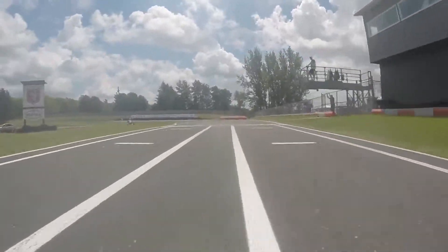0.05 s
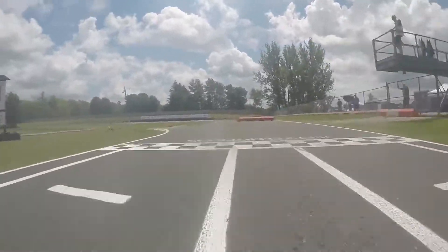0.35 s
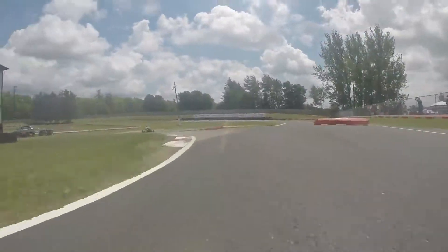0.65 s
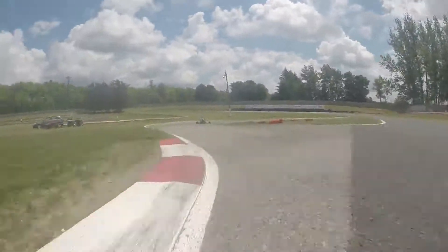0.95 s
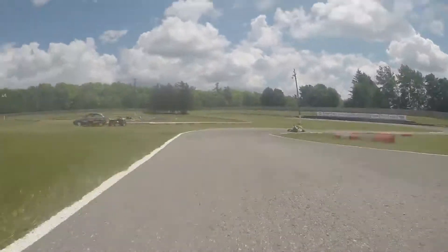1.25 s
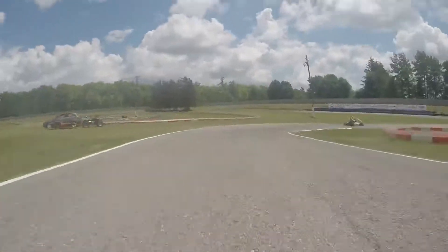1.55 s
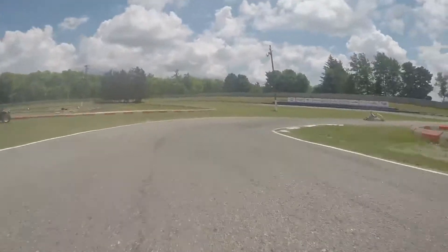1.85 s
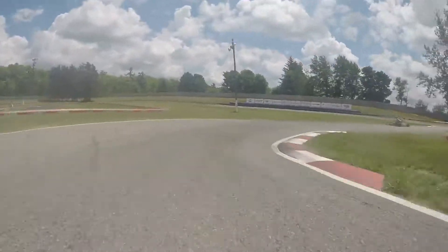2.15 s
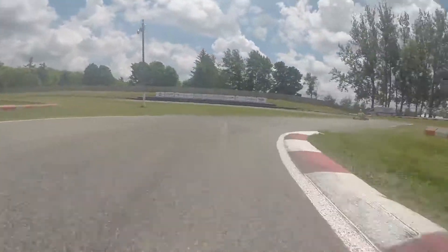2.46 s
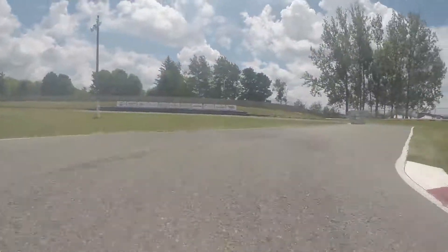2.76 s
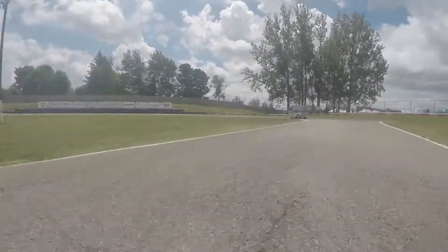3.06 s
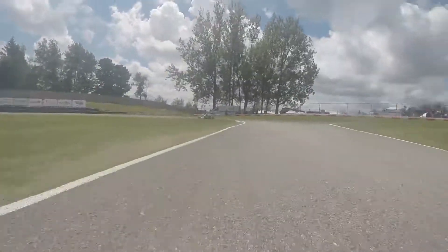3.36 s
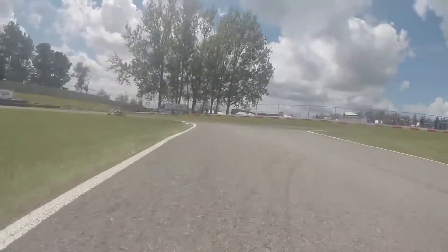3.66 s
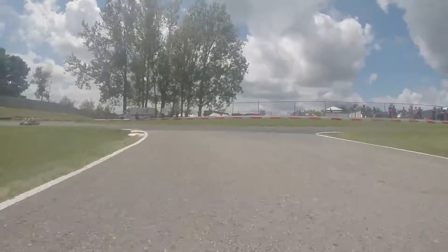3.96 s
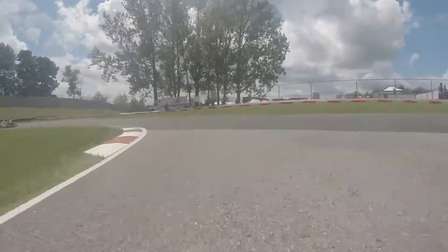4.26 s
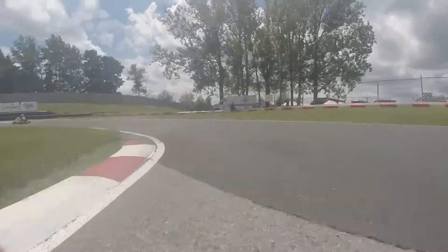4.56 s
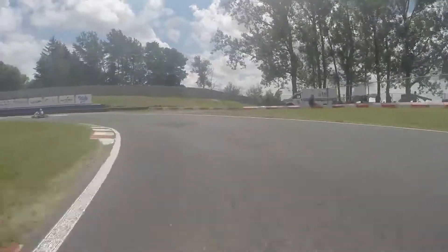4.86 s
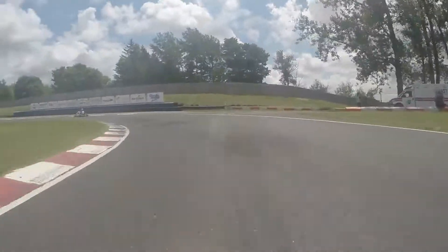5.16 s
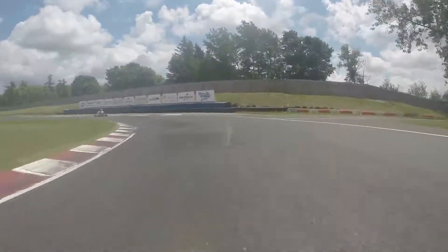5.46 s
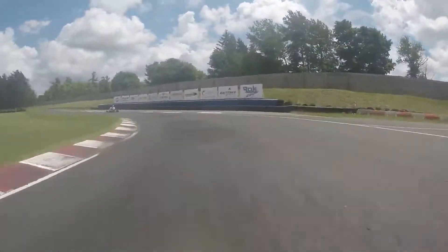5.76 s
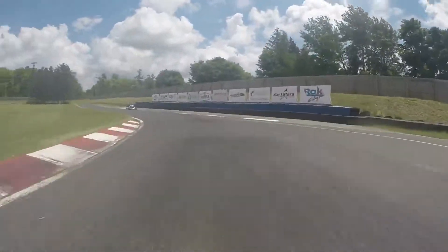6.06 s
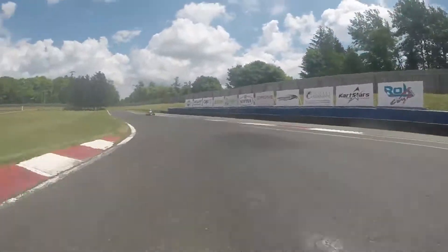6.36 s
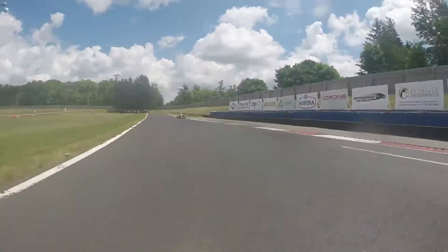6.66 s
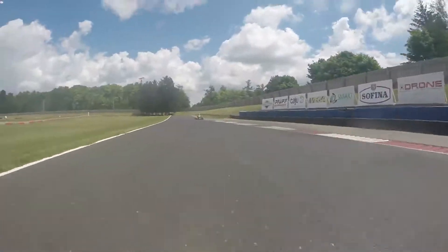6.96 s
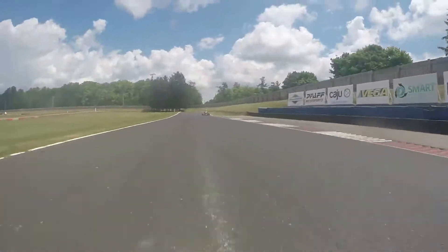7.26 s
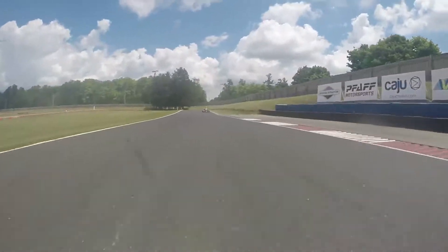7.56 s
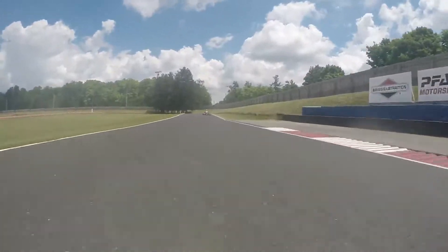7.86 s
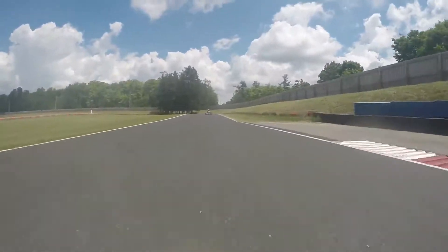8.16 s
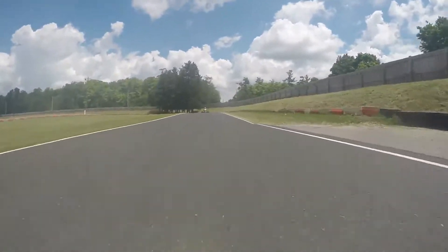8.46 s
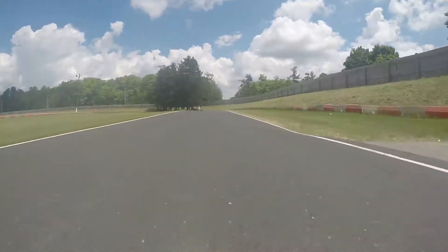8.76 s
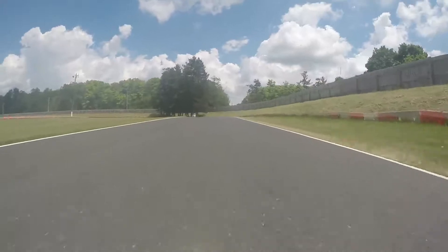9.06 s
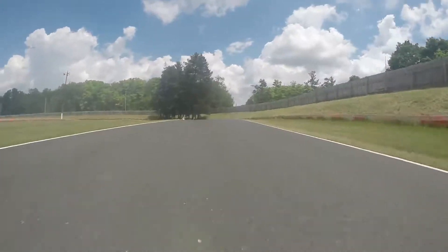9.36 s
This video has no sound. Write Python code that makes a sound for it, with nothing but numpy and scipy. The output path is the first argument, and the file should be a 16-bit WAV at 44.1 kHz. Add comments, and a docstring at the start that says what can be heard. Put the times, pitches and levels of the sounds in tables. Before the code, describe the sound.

A small single-cylinder kart engine throbs and hisses at speed, heard from on board on an outdoor track. It eases off for a corner, with sharp knocks, very short tyre skids and tiny clicks of flung stones. After running lower for a while, it climbs steadily in pitch, adding a hollow exhaust howl and the ticking of a loose part. Road drumming, panel rattle and low wind buffeting on the microphone continue throughout.

```python
"""On a kart track, riding a one-cylinder four-stroke kart as it slows for a corner and pulls away.
Each firing thumps the exhaust and lets out a puff of hiss. The turning engine shakes the frame;
when it works hard, the silencer howls and a loose part ticks louder. The road drums and rattles
the body panels, the tyres skid in short bursts and fling stone chips, bumps knock the frame
and wind buffets the microphone."""
import sys
import numpy as np
from scipy import signal
from scipy.fft import rfft, irfft, next_fast_len
from scipy.io import wavfile
from scipy.ndimage import uniform_filter1d, map_coordinates

SR = 44100
rng = np.random.default_rng(int(sys.argv[2]) if len(sys.argv) > 2 else 0)


def wrap_up_sound(samples):
    """Save the sound to the file named by the first command line argument, as 16-bit audio."""
    columns = np.atleast_2d(samples).T
    # keep every value between -1 and 1, then stretch to whole-number steps
    tamed = np.clip(columns, -1, 1)
    steps = np.round(tamed * 32767).astype(np.int16)
    wavfile.write(sys.argv[1], SR, steps)


N = 419391
TIME = np.arange(N) / SR

# notes the body panels ring at: (pitch [Hz], width [Hz], level [dB])
PANEL_NOTES = [(787, 11.4, 1), (1161, 230, 0), (1386, 132, 1), (1515, 74, -2), (1806, 44, -6.5),
               (2254, 310, -11)]
# notes of a clinking metal fitting: (pitch [Hz], width [Hz], level [dB])
FITTING_NOTES = [(1132, 102, 4.5), (1521, 42, 8.5)]
# tone of the road's drumming: (frequency [Hz], level [dB])
DRUM_TONE = [(50, -28.5), (110, -4.5), (150, 1.5), (195, 3), (250, 2), (310, 0), (380, -0.5), (420, -15),
             (470, -14.5), (540, -22), (700, -24.5), (1500, -60), (5000, -76)]


def amp(db):
    """Turn decibels into a number to multiply by."""
    return 10 ** (np.asarray(db) / 20)


def unit(x):
    """Scale a signal to an average strength (rms) of 1."""
    return x / np.sqrt(np.mean(x ** 2) + 1e-20)


def curve(points):
    """Join (time, value) points with straight lines."""
    return np.interp(TIME, *np.transpose(points))


def wobble(rate):
    """A smooth random curve through `rate` new values a second."""
    return map_coordinates(rng.standard_normal(int(N * rate / SR) + 4), [TIME * rate])


def white():
    """Fresh white noise."""
    return rng.standard_normal(N)


def colour(x, tone):
    """Give x the bass and treble of a tone table, at strength 1."""
    size = 2 * next_fast_len(N // 2 + 8192)
    hz, db = np.transpose(tone)
    log_gain = np.log(amp(np.interp(np.log(np.fft.rfftfreq(size, 1 / SR) + 1), np.log(hz), db)))
    # make the filter ring after each hit, never before it
    cepstrum = irfft(log_gain)[:size // 2]
    cepstrum[1:] *= 2
    return unit(irfft(rfft(x, size) * np.exp(rfft(cepstrum, size)))[:N])


def resonate(x, notes):
    """Let x ring an object's notes, at strength 1; narrow notes ring longer."""
    size = next_fast_len(N + 8192)
    f = np.fft.rfftfreq(size, 1 / SR)
    gain = sum((-1) ** k * amp(db) * hz * width / (hz * hz - f * f + 1j * f * width)
               for k, (hz, width, db) in enumerate(notes))
    return unit(irfft(rfft(x, size) * gain, size)[:N])


def fade(taps, life_s):
    """Give each tap a tail that dies away."""
    return signal.lfilter([1], [1, -np.exp(-1 / (life_s * SR))], taps)


def strokes(cycles, jitter_s, scatter_db):
    """One tap per cycle, a little uneven in time and size."""
    at = np.flatnonzero(np.diff(np.floor(cycles)) > 0)
    late, size = rng.standard_normal((len(at), 2)).T
    when = np.clip(at + late * jitter_s * SR, 0, N - 1).astype(int)
    return np.bincount(when, amp(scatter_db * size), N)


def once_a_cycle(cycles, lag, depth_db):
    """A volume curve that swells once in each cycle."""
    return unit(amp(depth_db * np.cos(np.pi * (cycles - lag)) ** 4))


def wind():
    """Gusts hit the microphone with a low, lumpy rumble."""
    # strength of the wind: (time [s], level [dB])
    gusts = [(0, -22.5), (1.2, -15), (1.75, -19), (2.2, -27), (2.9, -16), (3.7, -27.5), (4.35, -18.5),
             (5.6, -24), (6.6, -25.5), (9.5, -23.5)]
    # tone of the rumble: (frequency [Hz], level [dB])
    tone = [(10, -23.5), (22, -9.5), (35, 6.5), (50, 4), (70, -11), (120, -7), (400, -72)]
    return amp(curve(gusts) + 1.2 * wobble(5)) * colour(white(), tone)


def swish():
    """One soft, high swish near the start."""
    swell = np.exp(-((TIME - .37) / .14) ** 2)
    return amp(-40) * swell * colour(white(), [(1500, -30), (3000, 3), (3700, 4), (4800, -2), (8000, -42)])


def track():
    """Each stretch of track sets its own rattle, buzz and drumming, blending into the next."""
    # stretches of track: (start [s], panel rattle [dB], tray buzz [dB], drumming [dB])
    stretches = [(0, -35.5, -35, -20), (1.2, -34, -37.5, -18), (3.2, -35.5, -38, -18.5),
                 (4.45, -42.5, -49, -19.5), (5.3, -40.5, -52, -18.5), (6.12, -36, -35.5, -18),
                 (7.45, -39, -34.5, -20.5), (8.3, -36, -33, -18.5)]
    blend_s = .15
    starts, *levels = np.transpose(stretches)
    current = np.searchsorted(starts[1:], TIME)
    return [uniform_filter1d(db[current], int(blend_s * SR)) for db in levels]


def chips():
    """Flung stones hit the kart with tiny bright clicks; sand patters until it has slowed down."""
    # stone hits: (time [s], relative level [dB])
    stones = [(1.3724, -23.5), (1.6647, -25), (1.752, -23), (1.8983, -27), (2.047, -25), (2.624, -31)]
    # tone of the clicks: (frequency [Hz], level [dB])
    tone = [(1500, -25), (4000, 7.5), (7500, 6), (13500, -12), (15400, -20)]
    grains_per_s, sand_until_s = 30, 2.1
    hits, t = np.zeros(N + SR), np.arange(SR // 50) / SR
    for start, db in stones:
        click = rng.standard_normal(len(t)) * np.exp(-t / .0014)
        hits[round(start * SR):][:len(t)] += amp(db + 1) * click / np.abs(click).max()
    grains = (rng.random(N) < grains_per_s / SR) * rng.random(N) * (TIME < sand_until_s)
    clicks = hits[:N] + amp(-28.5) * white() * fade(grains, life_s=.0006)
    return clicks.std() * colour(clicks, tone)


def skids():
    """Tyres skip over the asphalt, shaking the kart and spraying grit."""
    # skids: (middle [s], level [dB], half length [s], grit compared with the level [dB])
    bursts = [(0.147, -29, 0.0094, -1), (0.953, -30, 0.01, -6.5), (1.315, -26.5, 0.029, -8),
              (1.588, -18, 0.0082, -9), (1.797, -23, 0.011, -5), (1.869, -26, 0.011, -23),
              (1.907, -24.5, 0.0055, -8.5), (1.989, -19, 0.012, -14.5), (2.129, -28.5, 0.018, -16),
              (2.52, -16, 0.016, -23), (3.31, -24.5, 0.0078, -16), (3.741, -25.5, 0.015, -14.5),
              (7.146, -26.5, 0.0084, -10), (7.174, -22.5, 0.0032, -1.5), (7.317, -31, 0.0035, -1),
              (7.331, -30.5, 0.0033, 0.5)]
    # tone of the grit: (frequency [Hz], level [dB])
    grit_tone = [(800, -12.5), (2400, 13.5), (3300, -2), (5500, 4), (7500, -4.5), (9000, -14), (12000, -34),
                 (15400, -39)]
    shake, grit = np.zeros(N), np.zeros(N)
    for middle, db, half_s, grit_db in bursts:
        swell = amp(db) / (1 + ((TIME - middle) / half_s) ** 4) ** .5
        shake += swell
        grit += swell * amp(grit_db)
    body = resonate(white(), PANEL_NOTES) + amp(2.5) * colour(white(), DRUM_TONE)
    body += amp(-7.5) * resonate(white(), FITTING_NOTES)
    spray = colour(white() * amp(3.3 * wobble(700)), grit_tone)
    return shake * body + grit * spray


def knocks():
    """Bumps knock the frame; each knock has its own loudness and brightness."""
    # blows: (time [s], level [dB], brightness [dB per octave])
    blows = [(1.366, -5, 5), (1.371, -5.5, 4), (1.711, -16, 6), (1.86, -7.5, 0), (1.956, -18, 2),
             (4.17, -11.5, -4), (4.231, -13, -4), (4.307, -6, -1), (4.398, -8, -2), (7.558, -17, 4),
             (8.523, -13, 4), (9.024, -7.5, 4)]
    # notes of the struck frame: (pitch [Hz], level [dB], time to fade by 60 dB [s])
    notes = [(510, -8.5, 0.015), (780, -6, 0.02), (960, 9, 0.0075), (1125, 1, 0.023), (1287, -5, 0.015),
             (1790, -7.5, 0.011), (2270, -1.5, 0.013)]
    out, t = np.zeros(N + SR), np.arange(SR // 8) / SR
    for start, db, brightness in blows:
        ring = np.zeros(len(t))
        for hz, note_db, fade_s in notes:
            struck_db = note_db + brightness * np.log2(hz / 1000) + rng.normal(0, 2.2)
            ring += amp(struck_db - 60 * t / fade_s) * np.sin(2 * np.pi * (hz * t + rng.random()))
        ring *= 1 - np.exp(-(t / .0005) ** 2)  # soften the very start
        thud = .65 * amp(-60 * t / .034) * np.sin(2 * np.pi * 290 * t)
        out[round(start * SR):][:len(t)] += amp(db) * (ring / np.abs(ring).max() + thud)
    return out[:N]


def rattle(cycles, rattle_db):
    """The panels rattle, harder when the road jolts them; the engine clinks a fitting on some turns."""
    jolts = (rng.random(N) < 60 / SR) * rng.random(N)
    clumps = 1 + 1.8 * np.tanh(2 * fade(jolts, life_s=.003))
    contacts = white() * (rng.random(N) < 2500 / SR)
    clinks = strokes(2 * cycles, jitter_s=.003, scatter_db=2) * (rng.random(N) < .3)
    sound = resonate(contacts * clumps, PANEL_NOTES) + .6 * resonate(clinks, FITTING_NOTES)
    return amp(rattle_db + wobble(15)) * sound


def strain(rate, throttle):
    """How hard the engine works, 0 to 1: it takes both speed and an open throttle."""
    full_rate_hz, shut_db, db_per_hz = 40.9, -28.5, 4.5
    return amp(shut_db * (1 - throttle) - db_per_hz * np.maximum(full_rate_hz - rate, 0))


def loose_parts(cycles, effort, buzz_db):
    """The engine's shaking buzzes the floor tray and taps a loose part, louder under strain."""
    # spells of harder ticking: (start [s], length [s])
    spells = [(8.345, 0.093), (8.464, 0.19), (8.882, 0.072), (9.024, .1), (9.157, .26)]
    # notes of the loose part: (pitch [Hz], width [Hz], level [dB])
    part_notes = [(1444, 29, 5.5), (2230, 130, 3), (2410, 190, 0), (3880, 79, -17.5)]
    # notes of the floor tray: (pitch [Hz], width [Hz], level [dB])
    tray_notes = [(444, 75, -2), (737, 133, -1.5), (827, 67, 2.5)]
    rest_db, strain_db, spell_boost_db = -51, -37, 6.5
    in_spell = sum((TIME > start) & (TIME < start + length) for start, length in spells)
    tick_gain = amp(rest_db) + effort * amp(strain_db + spell_boost_db * in_spell)
    force = amp(2.5 * np.tanh(1.5 * wobble(25)))
    force *= np.where(rng.random(N) < .55, 1, .25)  # some turns barely tap
    taps = strokes(2 * cycles + .3, jitter_s=.0008, scatter_db=1.8) * force
    # each tap bounces for a moment and jars the panels too
    bounces = unit(fade(taps, life_s=.0039))
    ticks = .85 * resonate(taps, part_notes) + .6 * resonate(white() * bounces, PANEL_NOTES)
    buzz = resonate(white() * (1 + 1.15 * bounces), tray_notes)
    return tick_gain * ticks + amp(buzz_db) * buzz


def howl(cycles, effort):
    """Under strain, rough firings make the silencer howl."""
    # notes of the silencer: (pitch [Hz], width [Hz], level [dB])
    notes = [(169, 37, -3.5), (391, 36, 4.5)]
    firings = strokes(cycles + .33, jitter_s=.0003, scatter_db=2)
    return amp(-29) * effort * resonate(firings, notes)


def fizz(rush, throttle):
    """Opening the throttle brightens the top of the hiss."""
    from_hz, shut_db, open_db = 9000, -4.5, 2
    top = signal.sosfiltfilt(signal.butter(3, from_hz, "high", fs=SR, output="sos"), rush)
    return rush + (amp(shut_db * (1 - throttle) + open_db * throttle) - 1) * top


def hiss(cycles, throttle):
    """Gas puffs out once a cycle, more sharply on open throttle, and the engine's metal rings."""
    # loudness of the hiss: (time [s], relative level [dB])
    levels = [(0, -44.5), (1.3, -46), (2.2, -51), (3.0, -48.5), (4.2, -47.5), (6.7, -45.5), (7.9, -49.5),
              (8.5, -47.5), (9.5, -49)]
    # tone of the rushing gas: (frequency [Hz], level [dB])
    tone = [(400, -24), (900, 6.5), (1500, 8), (1950, 6.5), (2350, 13.5), (3100, 0), (4200, 1.5),
            (5000, -2.5), (7200, -4), (8300, -9), (10200, -11), (11500, -18), (13500, -20.5), (15400, -40)]
    # notes of the engine's metal: (pitch [Hz], width [Hz], level [dB])
    metal_notes = [(3850, 67, -1), (4340, 64, 6), (5110, 69, 4), (5900, 60, 3.5), (6800, 115, 0.5),
                   (7300, 150, 0)]
    puffs = once_a_cycle(cycles, lag=.016, depth_db=5.5 + throttle)
    snaps = fade(strokes(cycles + .04, jitter_s=.0009, scatter_db=2.5), life_s=.003)
    rush = colour(white() * (puffs + .2 * throttle * unit(snaps)), tone)
    ring = resonate(white() * puffs, metal_notes)
    sound = amp(5.5) * fizz(rush, throttle) + amp(-8) * throttle * ring
    return amp(curve(levels) + 1.15 * wobble(35)) * sound


def throb(cycles, rate, throttle):
    """The engine hums at 1 to 4 times its firing rate; a hum booms when it meets a note of the frame."""
    # deep notes of the frame: (pitch [Hz], width [Hz], level [dB])
    notes = [(33.2, 7, -18.5), (38.2, 9.4, -15.5), (62.6, 8.7, -20), (81.3, 9, -15.5), (90.5, 15.3, -13.5),
             (102.7, 14, -16.5), (140, 14.5, -27), (168, 37, -30.5)]
    waver = .075 - .05 * throttle
    shut = (1 - throttle) ** 2
    # braking on the engine into the corner swells the hums of its turning shaft
    braking = np.exp(-((TIME - 2.27) / .29) ** 4)
    firing_db, shaft_db = -15.5 * shut, -4.5 * shut + 10 * braking
    out = np.zeros(N)
    for k, drive_db in enumerate([firing_db, shaft_db, firing_db - 6.5, shaft_db], 1):
        power = sum((amp(db) / (1 + (2 * (k * rate - hz) / width) ** 2)) ** 2 for hz, width, db in notes)
        level = np.sqrt(2 * power) * amp(drive_db + 1.54 * wobble(16))
        # all four waves dip together as the engine sucks in air
        out -= level * np.cos(2 * np.pi * (k * (cycles - .13) + waver * wobble(13)))
    return out


def exhaust_and_road(cycles, throttle, drum_db):
    """Firings thump the silencer; on open throttle they stand out from the road's drumming."""
    # tone of the exhaust: (frequency [Hz], level [dB])
    tone = [(90, -56), (140, -9.5), (185, -2), (222, -10), (262, 3), (295, 5), (335, -1.5), (385, 0),
            (425, -17.5), (470, -12.5), (540, -26.5), (2000, -80)]
    thumps = colour(strokes(cycles + .33, jitter_s=.0001, scatter_db=1.6), tone)
    road = colour(white() * once_a_cycle(cycles, lag=.5, depth_db=2 * throttle), DRUM_TONE)
    share = .58 * throttle ** 2
    return amp(drum_db + wobble(7)) * (np.sqrt(share) * thumps + np.sqrt(1 - share) * road)


def dip():
    """A volume curve that drops briefly just after the first knocks, holds and recovers."""
    start_s, depth_db, hold_s, recover_s = 1.385, -6.5, .19, .37
    since = TIME - start_s
    drop = np.clip(since / .0076, 0, 1)
    hold = np.clip(1 - (since - hold_s) / recover_s, 0, 1)
    return amp(depth_db * drop * hold)


def scene():
    """Engine speed and throttle drive the engine and what it shakes; track and wind add the rest."""
    # engine speed: (time [s], firing rate [Hz])
    speeds = [(0.0, 48.0), (0.33, 39.6), (0.6, 42.2), (1.3, 42.2), (1.5, 36.7), (2.4, 34.9), (2.7, 32.6),
              (2.9, 32.5), (3.1, 31.3), (3.35, 32.5), (4.1, 32.5), (5.1, 33.85), (5.7, 33.0), (6.3, 34.3),
              (6.6, 35.3), (7.3, 36.6), (8.7, 41.5), (9.51, 43.75)]
    # how far the throttle (gas pedal) is open: (time [s], opening [0 to 1])
    pedal = [(0, .5), (1.25, .45), (1.45, .1), (2.5, .15), (3.2, .6), (4.5, .8), (6.3, .8), (6.8, 1),
             (8.2, 1), (9.5, .85)]
    rate, throttle = curve(speeds), curve(pedal)
    # counts the cycles: each is one firing and two turns of the shaft
    cycles = np.cumsum(rate * (1 + .003 * wobble(14))) / SR
    effort = strain(rate, throttle)
    rattle_db, buzz_db, drum_db = track()
    drive = throb(cycles, rate, throttle) + exhaust_and_road(cycles, throttle, drum_db)
    drive += hiss(cycles, throttle)
    frame = rattle(cycles, rattle_db) + loose_parts(cycles, effort, buzz_db)
    jolts = knocks() + skids()
    return (dip() * (drive + frame + chips()) + jolts + swish() + wind() + howl(cycles, effort))[None]


def record(dry):
    """Round off the loudest peaks and cut the very highest treble."""
    ceiling, top_hz = .85, 15450
    rounded = dry / (1 + np.abs(dry / ceiling) ** 8) ** (1 / 8)
    size = next_fast_len(N + 8192)
    return irfft(rfft(rounded, size) * (np.fft.rfftfreq(size, 1 / SR) < top_hz), size)[:, :N]


dry = scene()
out = record(dry)
wrap_up_sound(out)
```